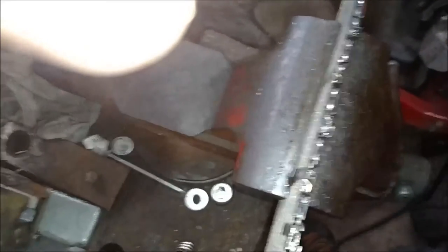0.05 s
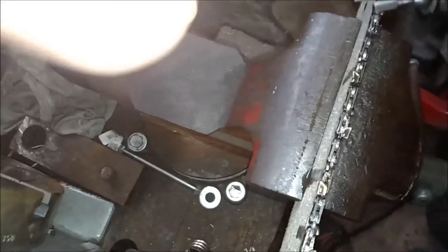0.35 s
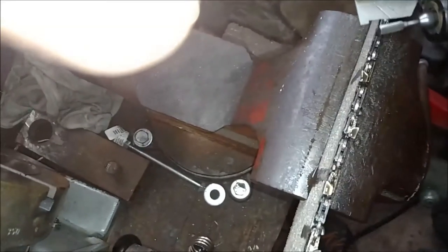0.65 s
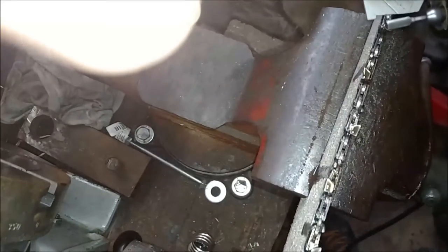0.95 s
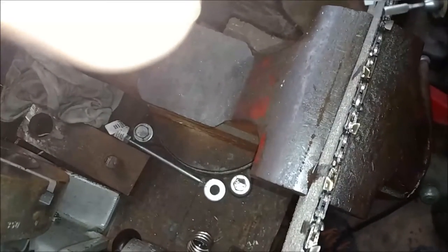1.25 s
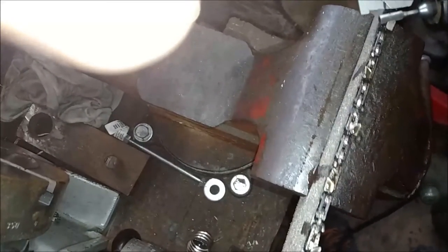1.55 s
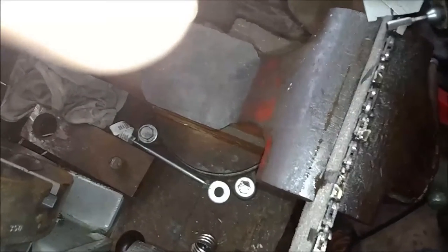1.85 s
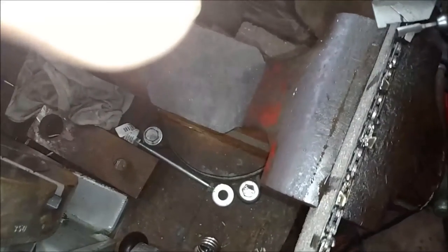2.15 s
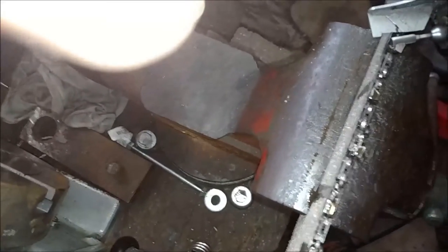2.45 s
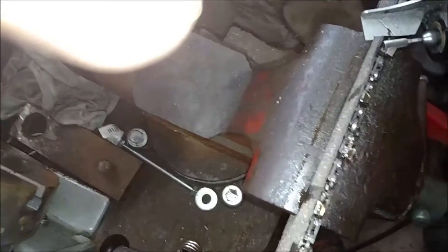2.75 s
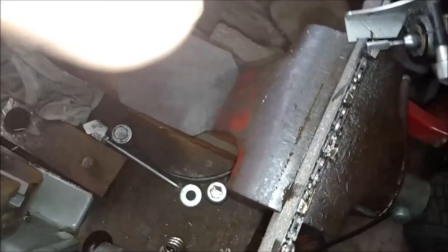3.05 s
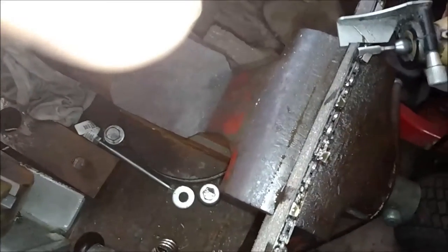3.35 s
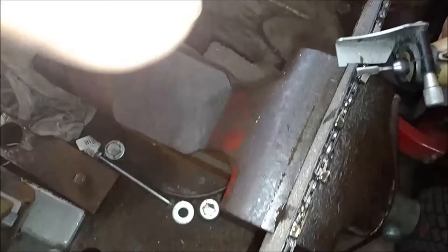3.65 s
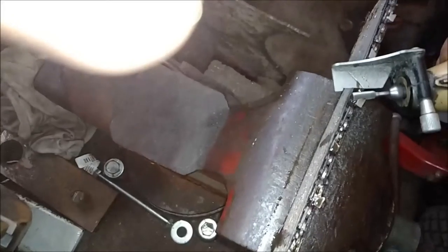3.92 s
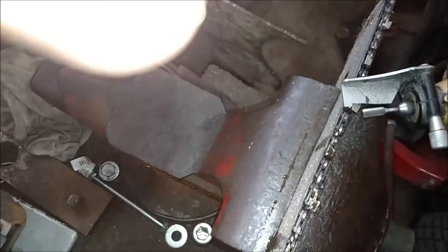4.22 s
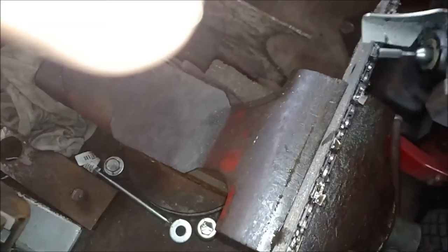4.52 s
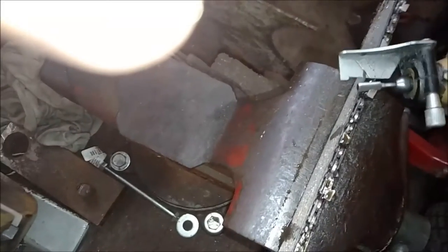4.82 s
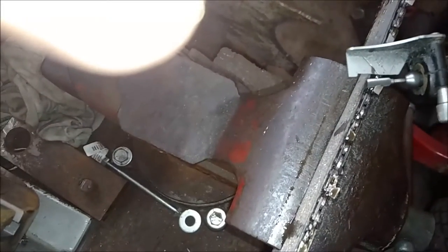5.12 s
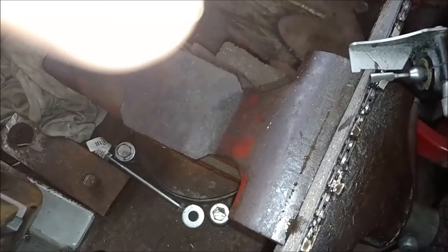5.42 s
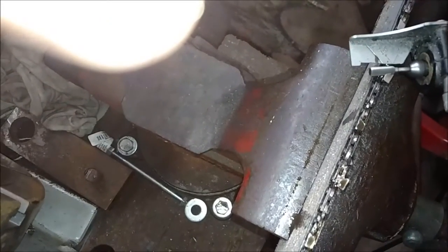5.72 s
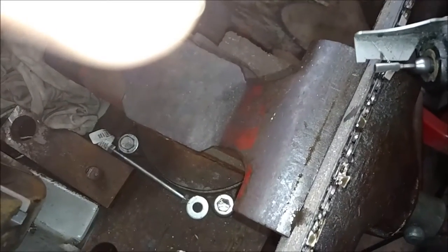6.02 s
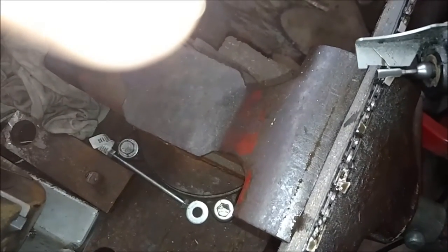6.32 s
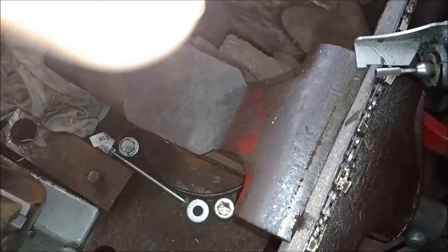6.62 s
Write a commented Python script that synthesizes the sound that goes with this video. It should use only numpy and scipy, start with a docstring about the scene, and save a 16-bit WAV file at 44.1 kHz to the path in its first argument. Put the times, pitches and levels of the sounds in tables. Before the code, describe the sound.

A handheld rotary tool whines, then grinds a steel saw chain in two screeching passes, its pitch dropping under load.

```python
"""A handheld rotary tool with a 15-tooth burr sharpens a saw chain clamped in a vice, in a small workshop.
The motor whines freely; from 1.1 s the burr skips on the cutter once a turn. At 1.7 s it bites and drags
the speed down: the teeth whine, the steel rings and screeches, chips hiss, the bar growls and chatters.
At 4.2 s the burr snags and kicks off, and the motor recovers. After more skips, a second pass runs from
5 s to the end and slows the shaft much further."""
import sys
import numpy as np
from scipy import signal
from scipy.fft import rfft, irfft
from scipy.io import wavfile
from scipy.ndimage import uniform_filter1d

SR = 44100
rng = np.random.default_rng(int(sys.argv[2]) if len(sys.argv) > 2 else 0)


def generate_wav(sig):
    """Save sig (samples, or channels by samples) to the path in sys.argv[1] as 16-bit PCM at SR."""
    pcm = np.round(np.clip(np.atleast_2d(sig).T, -1, 1) * 32767).astype(np.int16)
    wavfile.write(sys.argv[1], SR, pcm)


N = 302967
TIME = np.arange(N) / SR
TOUCH_S, RELEASE_S = 0.015, 0.013  # burr landing, lifting

# passes of the burr: start/s, end/s, bite time/s, cutting/dB, tooth whine/dB, chip hiss/dB
PASSES = [(1.699, 4.245, 0.24, -25.7, -23.8, -41), (5, 6.9, 0.056, -25.8, -24.8, -42.5)]
# modes of cutter, chain and bar: f/Hz, width/Hz, level/dB
STEEL_MODES = [(3252, 77, 5.5), (3708, 64, 8), (4350, 160, 2.5), (4830, 164, 5.5), (5630, 240, 3.5),
               (5890, 176, 6.5), (6330, 370, 5), (6610, 230, 4), (7000, 410, -0.5), (8280, 230, 1),
               (8830, 140, -12), (12400, 1100, -2.5), (12700, 15600, -10.5)]


def undb(db):
    """Decibels to gain."""
    return 10 ** (np.asarray(db) / 20)


def gate(start_s, end_s, attack_s, release_s):
    """Linear attack, hold, release."""
    return np.clip(np.minimum((TIME - start_s) / attack_s, (end_s - TIME) / release_s), 0, 1)


def steady(x):
    """Hold the 50 ms rms at 1."""
    return x / np.sqrt(uniform_filter1d(x * x, size=2205) + 1e-12)


def band(x, lo_hz, hi_hz):
    """Steep band-pass."""
    sos = signal.butter(4, [lo_hz, min(hi_hz, .48 * SR)], "band", fs=SR, output="sos")
    return signal.sosfilt(sos, x)


def colour(x, points, size=2048):
    """Causal unit-power filter shaped by points of f/Hz, level/dB."""
    hz, db = np.transpose(points)
    grid_hz = np.maximum(np.fft.rfftfreq(size, 1 / SR), 1)
    cepstrum = irfft(np.log(undb(np.interp(np.log(grid_hz), np.log(hz), db))))
    response = irfft(np.exp(rfft(2 * cepstrum[:size // 2], size)))
    return signal.fftconvolve(x, response / np.linalg.norm(response))[:N]


def resonate(force, modes):
    """Sum of resonances (f/Hz, width/Hz, level/dB), alternating in sign."""
    return sum((-1) ** k * undb(db) * signal.lfilter(*signal.iirpeak(hz, hz / width_hz, SR), force)
               for k, (hz, width_hz, db) in enumerate(modes))


def wander(shape, hold):
    """Smooth random drift of unit spread, lasting about hold steps along the first axis."""
    x = rng.standard_normal(shape)
    for _ in range(2):
        x = uniform_filter1d(x, max(int(hold), 1), axis=0, mode="wrap")
    return x / x.std()


def spin(turn, orders, smear, drift_db, sway, hold, size=1024):
    """Drifting shaft harmonics (order, level/dB), a smeared burst a turn; sway and hold are in turns."""
    multiples = np.arange(orders[-1][0] + 1)
    order_db = np.interp(multiples, *np.transpose(orders), left=-np.inf)
    shape = (size * 3 // 2, len(multiples))  # one row a turn
    lag = multiples / 2 + smear * np.cumsum(rng.uniform(-0.526, 0.5117, len(multiples)))
    gain = undb(order_db + drift_db * wander(shape, hold))
    lag = lag + sway * multiples * wander(shape, hold)
    wave = irfft(gain * np.exp(-2j * np.pi * lag), size).ravel() * size / np.sqrt(2)
    return np.interp(turn * size, np.arange(len(wave)), wave)


def contact(turn, tight):
    """The burr runs slightly out of true and presses hardest in mid-turn."""
    return np.exp(-tight * (np.cos(2 * np.pi * turn) + 1))


def touching():
    """1 while the burr is in a cut."""
    return sum(gate(start, end, TOUCH_S, RELEASE_S) for start, end, *_ in PASSES)


def workshop(x, t60_s=0.22, wet_db=-18):
    """Add short, dull reflections from bench and walls."""
    age = TIME[:SR // 2]
    tail = band(rng.standard_normal(len(age)), 230, 4200) * undb(-60 * age / t60_s) * (age > .003)
    return x + undb(wet_db) * signal.fftconvolve(x, tail / np.linalg.norm(tail))[:N]


def cooling_air(turn, load):
    """Air rushes through the tool, pulsing faintly each turn and fading under load."""
    # air noise spectrum: f/Hz, level/dB
    spectrum = [(25, 0.5), (90, 2), (160, 5), (280, 2), (480, 4), (800, 10.5), (1300, -1), (1950, 11.5),
                (3400, 4), (5000, -3), (6700, -5), (8400, -2), (11000, -13), (15500, -27)]
    rush = colour(rng.standard_normal(N), spectrum)
    return undb(-43.7 - 24 * load) * rush * steady(contact(turn, tight=0.025))


def unbalance(turn, speed_hz, load, light_db=-44.5, deep_db=-62.5, damping_load=0.069):
    """The unbalanced shaft hums; in a cut it groans an octave higher, most at a light touch."""
    # hum against shaft speed: f/Hz, rms level/dB
    hum_levels = [(145, -49), (170, -53.5), (180, -60), (196, -52.5)]
    hum = undb(np.interp(speed_hz, *np.transpose(hum_levels))) * np.sin(2 * np.pi * turn)
    groan_gain = touching() * (undb(light_db) * np.exp(-(load / damping_load) ** 4) + undb(deep_db))
    groan = groan_gain * np.sin(4 * np.pi * turn) * undb(2 * wander(N, hold=1100))
    return np.sqrt(2) * (hum + groan)


def motor(turn, load, mains_hz=60):
    """Shaft harmonics and brush buzz; the whine throbs at twice the mains frequency."""
    # free-running whine: shaft order, level/dB
    whine_orders = [(2, -68), (3, -39), (4, -35.5), (5, -44), (6, -64), (7, -59.5), (8, -58), (9, -44.5),
                    (10, -48.5), (11, -41), (12, -51), (13, -48.5), (14, -83), (15, -51.5), (17, -55.5),
                    (19, -58.5), (22, -65), (23, -56)]
    # brush buzz: shaft order, level/dB
    brush_orders = [(24, -75), (26, -72.5), (27, -66), (29, -72.5), (35, -73.5), (38, -75), (40, -82),
                    (44, -72.5), (49, -82), (51, -69), (55, -100), (64, -92), (78, -110)]
    whine = band(spin(turn, whine_orders, smear=0.52, drift_db=.9, sway=0.0038, hold=18), 314, 13500)
    whine = whine - 0.71 * resonate(whine, [(735, 135, 0)])  # dead spot between two housing modes
    brushes = spin(turn, brush_orders, smear=1.0, drift_db=5, sway=0.0018, hold=66)
    throb = np.sin(4 * np.pi * mains_hz * TIME) * whine
    housing_ring = undb(-0.5) * band(throb, 1693, 1954) + undb(-14) * band(throb, 1930, 7200)
    return (whine + undb(-16) * throb + housing_ring + undb(2.8) * brushes) * undb(-30 * load)


def knocks(turn, skip_decay_s=0.004, scatter_db=2.5):
    """At a light touch the burr bounces off the cutter once a turn; a snag gives hard blows and a thud."""
    # spells of skipping: start/s, end/s, level/dB
    skips = [(1.098, 1.131, -30.5), (1.528, 1.573, -30), (1.578, 1.823, -28), (4.261, 4.272, -33.5),
             (4.32, 4.357, -38), (4.818, 4.878, -29), (4.873, 4.988, -24.5), (4.975, 5.057, -33.5)]
    # hardest blows: t/s, level/dB, decay/s
    hard_blows = [(1.097, -18, 0.00083), (1.115, -27, 0.0012), (1.128, -28, 0.0017), (1.5316, -24, 0.003),
                  (1.547, -18, 0.00092), (1.5727, -21, 0.0012), (1.602, -30, 0.0032), (4.227, -22, 0.0034),
                  (4.2357, -9, 0.005), (4.2401, -20, 0.0052), (4.2533, -22, 0.0027), (4.8273, -23, 0.0012),
                  (4.8844, -15, 0.0011), (4.977, -29, 0.0012)]
    # spectrum of a blow: f/Hz, level/dB
    spectrum = [(120, -84), (200, -26), (575, -3.5), (690, -9.5), (1330, -2.5), (1540, -16.5), (1740, -2.5),
                (2470, -0.5), (3420, -8), (4750, -8.5), (6130, -10.5), (8050, -17), (8980, -17.5),
                (11000, -27.5), (15500, -27)]
    # tool body as the burr lands or kicks off: t/s, f/Hz, level/dB, decay/s
    thuds = [(1.536, 380, -36, 0.045), (4.244, 331, -37, 0.039), (4.253, 240, -33, 0.019)]
    turn_times = TIME[1:][np.diff(np.floor(turn)) > 0]
    bounces = [(t, db + scatter_db * rng.uniform(-1, 1), skip_decay_s)
               for start, end, db in skips for t in turn_times if start < t < end]
    force, age = np.zeros(N), TIME[:SR // 20]
    for t, db, decay_s in bounces + hard_blows:
        onset = int(t * SR)
        force[onset:onset + len(age)] += undb(db) * np.exp(-age / decay_s)
    out = colour(force * rng.standard_normal(N), spectrum)
    for t, hz, db, decay_s in thuds:
        since = np.maximum(TIME - t, 0)
        out += undb(db) * np.sin(2 * np.pi * hz * since) * np.exp(-since / decay_s)
    return out


def chatter(turn, fade_s=.06, waver_db=1.5):
    """Under pressure the bar locks to a shaft harmonic, sings unsteadily and lets go."""
    # spells of chatter: start/s, end/s, shaft order, level/dB
    spells = [(2.2, 2.95, 6, -34.5), (3.14, 3.47, 7, -34.5), (3.15, 3.42, 12, -33.5),
              (3.15, 3.44, 18, -35.5), (3.38, 4.0, 8, -38), (3.66, 3.9, 7, -36), (3.64, 3.92, 11, -37),
              (5.25, 5.57, 7, -36), (5.61, 5.89, 6, -33), (5.92, 6.35, 5, -28.5), (6.48, 6.79, 5, -32)]
    tones = sum(undb(db) * gate(start, end, fade_s, fade_s) * np.sin(2 * np.pi * order * turn)
                for start, end, order, db in spells)
    return np.sqrt(2) * tones * undb(waver_db * wander(N, hold=730))


def growl(turn, load, depths, light_db=-30, stall_rise_db=6.5):
    """The clamped bar answers each turn with low harmonics that grow with the depth of cut."""
    # bar harmonics, one list a pass: shaft order, level/dB
    bar_orders = [
        [(4, -44.5), (5, -39.5), (7, -40.5), (9, -50.5), (10, -54), (11, -70), (12, -39), (14, -34.5),
         (17, -43.5), (20, -51)],
        [(5, -44), (6, -40), (7, -45), (8, -39), (9, -48.5), (12, -39), (14, -43), (17, -44.5), (19, -40),
         (21, -42)],
    ]
    bar = sum(depth ** 2 * steady(spin(turn, orders, smear=0.52, drift_db=3.3, sway=0.003, hold=18))
              for depth, orders in zip(depths, bar_orders))
    return undb(light_db + stall_rise_db * load) * bar


def chip_hiss(turn, load, tearing, grit):
    """Chips fly in one spurt a turn, briefer under load."""
    spurts = (2.2 * tearing + steady(grit)) * contact(turn, tight=.3 + 2.5 * load)
    return steady(band(resonate(spurts, STEEL_MODES), 9800, 19600))


def rasp(roughness):
    """Dull noise of the teeth tearing unevenly."""
    # rasp spectrum: f/Hz, level/dB
    spectrum = [(300, -35), (600, 0), (1600, -6), (2400, 2), (3000, -9.5), (4500, -11)]
    return roughness ** 1.5 * undb(-3.5) * colour(rng.standard_normal(N), spectrum)


def screech(turn, scraping, fade_s=0.02):
    """The teeth keep single cutter modes ringing; each swells and dies as the contact point moves."""
    # screeching modes: start/s, end/s, f/Hz, width/Hz, rms level/dB
    screeches = [(2.34, 2.61, 5890, 400, -28.5), (2.3, 2.586, 8500, 900, -37),
                 (3.417, 3.913, 6040, 500, -32), (5.167, 5.245, 4780, 200, -25.5),
                 (5.348, 5.515, 3770, 120, -36), (5.35, 5.5, 7900, 250, -38),
                 (5.458, 5.615, 6070, 696, -25.5), (5.606, 5.672, 4860, 250, -24.5),
                 (5.66, 5.817, 6230, 500, -29), (6.28, 6.644, 11120, 600, -41),
                 (5.15, 6.95, 12700, 600, -49.5), (6.54, 6.95, 4300, 150, -33), (6.6, 6.95, 6460, 300, -29)]
    force = spin(turn, [(18, 0), (85, 0)], smear=0.5, drift_db=2.5, sway=0.001, hold=20) + .9 * scraping
    out = np.zeros(N)
    for start, end, hz, width_hz, db in screeches:
        mode = [(hz, width_hz, 0)]
        out += undb(db) * gate(start, end, fade_s, fade_s) * steady(resonate(resonate(force, mode), mode))
    return out


def steel_ring(force, flare_db=1.8, flare_s=.045):
    """Each steel mode swells and fades on its own as the contact point moves."""
    ring = sum((-1) ** k * resonate(force * undb(flare_db * wander(N, hold=flare_s * SR)), [mode])
               for k, mode in enumerate(STEEL_MODES))
    return steady(band(ring, 3120, 8910))


def tooth_whine(turn, load, roughness, teeth=15, mode_hz=2710, width_hz=520):
    """The teeth drive a broad cutter mode: purer under load, breaking up as they slip in a rough cut."""
    slip_rad, flicker_db = .55, 2.5
    bounce_end_load, settling_range, seating_load = .09, .055, 0.028
    torn = np.minimum(roughness, 1)
    shaft_rad = 2 * np.pi * turn
    tooth_rad = teeth * shaft_rad + slip_rad * torn * wander(N, hold=300)
    # the tooth rate beats with the order below while bouncing, the order above once seated
    loose = np.clip((bounce_end_load - load) / settling_range, 0, 1)
    lower = loose * np.sin(tooth_rad - shaft_rad)
    upper_gain = np.minimum(undb(8.5 - 100 * load), 1) * undb(6.2 * wander(N, hold=4600))
    upper = upper_gain * (1 - loose) * np.sin(tooth_rad + shaft_rad)
    force = (np.sin(tooth_rad) - upper - lower) * contact(turn, tight=7.6 * np.exp(-load / seating_load))
    flicker = undb(flicker_db * torn * wander(N, hold=450))
    return steady(resonate(force, [(mode_hz, width_hz, 0)])) * flicker


def catches():
    """The burr catches in the cutter: five gains of the cut swell or dip, then ease back."""
    # catches: middle/s, length/s, change of cutting/dB, tooth whine/dB, scraping/dB, growl/dB, hiss/dB
    events = [(1.916, 0.51, 4, 10.5, 10.5, 3, 2), (2.24, 0.42, -0.5, 1.5, 7, 1.5, -4),
              (2.43, 1, 3, -2, -2, 3.5, 1), (4.214, 0.91, 1, -8, 8, -1.5, 2),
              (5.12, 0.21, 0.5, -4, 10, 2.5, 1), (5.23, 0.15, 2, 0.5, 3, 0.5, 4),
              (5.351, 0.23, 3.5, -5.5, 7, -3, -3), (5.52, 0.3, 2, -3.5, 9, 2, -10),
              (5.647, 0.17, -2.5, -2, 11.5, 0.5, -24), (5.726, 0.095, 2.5, 5.5, 3, 5, -11),
              (5.848, 0.12, 0, 1, 10.5, 3.5, -21), (6.33, 0.14, 1.5, 2, 9, 0, -10),
              (6.654, 0.53, 1, 0.5, 3.5, 1.5, 1.5), (6.86, 0.19, 2, -5, 9.5, 0.5, -6)]
    return undb(sum(np.outer(changes_db, np.cos(np.pi * np.clip((TIME - middle) / length, -.5, .5)) ** 2)
                    for middle, length, *changes_db in events))


def cutting(turn, load):
    """The teeth tear much the same chips every turn, with fresh scraping on top; both ring the steel."""
    cut_gain, whine_gain, hiss_gain = np.zeros((3, N))
    depths = []
    for start, end, bite_s, cut_db, whine_db, hiss_db in PASSES:
        touch = gate(start, end, TOUCH_S, RELEASE_S)
        depth = touch * (1 - np.exp(-np.maximum(TIME - start, 0) / bite_s))
        depths.append(depth)
        cut_gain += depth * undb(cut_db)
        whine_gain += depth * undb(whine_db)
        hiss_gain += touch * undb(hiss_db)
    louder, shriller, rougher, deeper, hissier = catches()
    bar = deeper * growl(turn, load, depths)
    cut_gain *= louder * undb(.9 * wander(N, hold=2200))  # unsteady hand pressure
    roughness = rougher * undb(-12)
    tearing = steady(spin(turn, [(1, 0), (110, 0)], smear=0.6, drift_db=4, sway=0.0017, hold=12))
    grit = signal.lfilter([1, -.8], [1, -.35], rng.standard_normal(N)) * undb(0.73 * wander(N, hold=18))
    scraping = undb(7) * roughness * steady(grit * contact(turn, tight=0.1))
    return (bar
            + cut_gain * steel_ring(tearing + scraping)
            + screech(turn, scraping)
            + cut_gain * rasp(roughness)
            + whine_gain * shriller * tooth_whine(turn, load, roughness)
            + hiss_gain * hissier * chip_hiss(turn, load, tearing, grit))


def scene():
    """One shaft drives everything: turn counts its revolutions, load is the share of free speed lost."""
    # shaft speed: t/s, f/Hz
    shaft_speeds = [(0.0, 197.3), (.45, 197.3), (.86, 195.4), (1.5, 194.2), (1.72, 193), (1.82, 194.4),
                    (1.94, 187.4), (2.0, 181.7), (2.09, 180.8), (2.2, 175.7), (2.24, 178.5), (2.39, 182.6),
                    (2.46, 178.3), (2.56, 180.7), (2.76, 178.6), (2.86, 180.0), (3.08, 179.0),
                    (3.26, 180.4), (3.67, 177.8), (3.77, 180.1), (3.91, 178.0), (4.05, 178.4),
                    (4.23, 176.2), (4.37, 192.0), (4.57, 197.7), (4.8, 197), (5.0, 189.7), (5.072, 189.8),
                    (5.244, 178.2), (5.342, 178.4), (5.468, 175.5), (5.608, 167.3), (5.842, 146.3),
                    (5.868, 145.3), (5.988, 151.6), (6.118, 148.7), (6.16, 150.7), (6.302, 147.6),
                    (6.488, 150.5), (6.588, 148.0), (6.64, 144.3), (6.738, 145.8), (6.87, 144.2)]
    speed_hz = np.interp(TIME, *np.transpose(shaft_speeds))
    load = 1 - speed_hz / speed_hz.max()
    flutter = (0.00057 + 0.00813 * load) * wander(N, hold=400)
    hand_sway = .0009 * touching() * wander(N, hold=2970)
    turn = np.cumsum(speed_hz * (1 + flutter + hand_sway)) / SR
    tool = motor(turn, load) + cooling_air(turn, load) + unbalance(turn, speed_hz, load)
    mono = tool + workshop(cutting(turn, load) + chatter(turn) + knocks(turn))
    return np.array([mono, mono])


def record(dry, ceiling=0.54, top_hz=15750):
    """Round the loudest peaks and cut the top treble."""
    rounded = dry / (1 + (dry / ceiling) ** 6) ** (1 / 6)
    return signal.sosfilt(signal.ellip(10, .2, 80, top_hz, fs=SR, output="sos"), rounded)


dry = scene()
out = record(dry)
generate_wav(out)
```